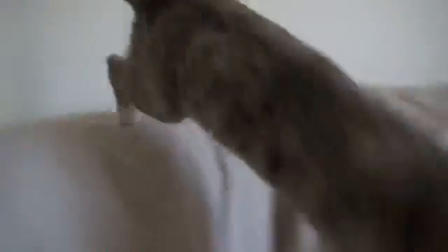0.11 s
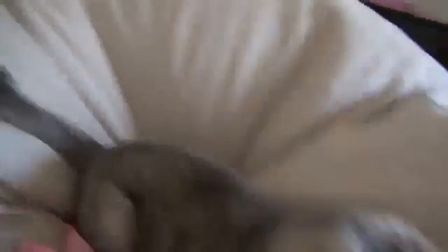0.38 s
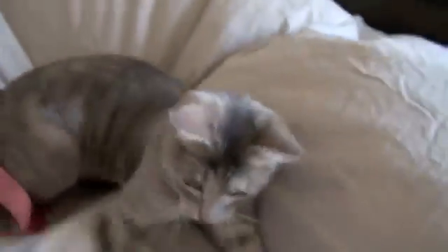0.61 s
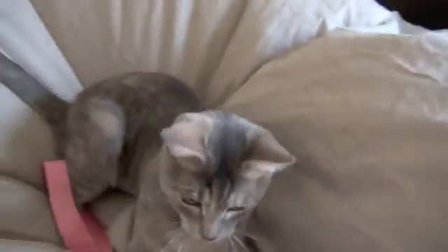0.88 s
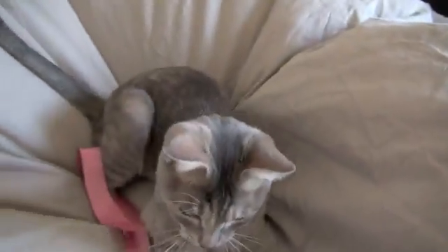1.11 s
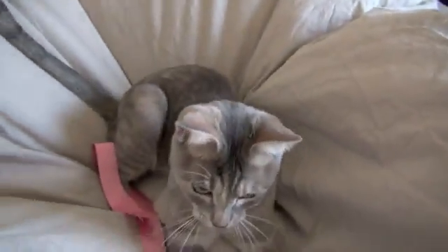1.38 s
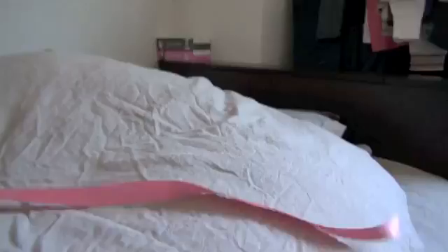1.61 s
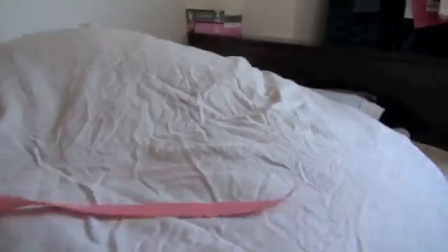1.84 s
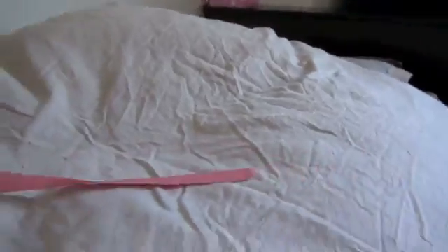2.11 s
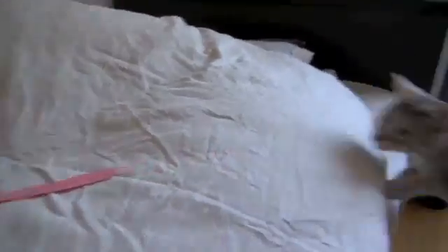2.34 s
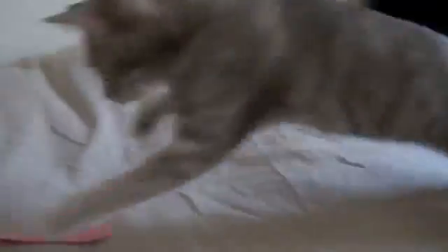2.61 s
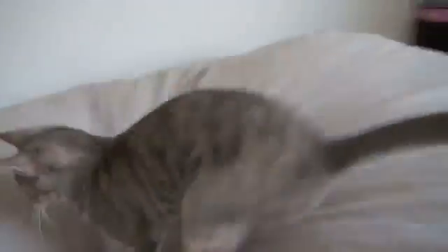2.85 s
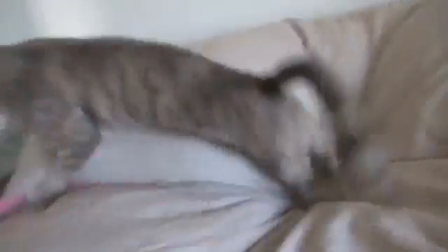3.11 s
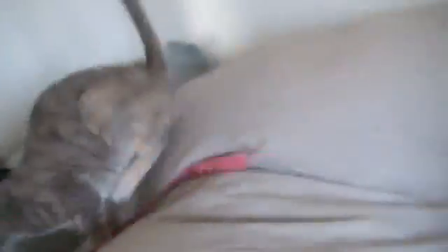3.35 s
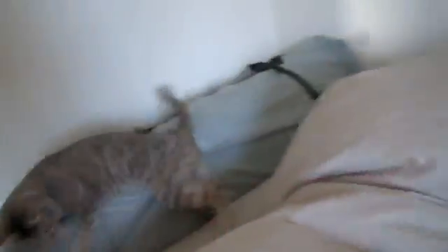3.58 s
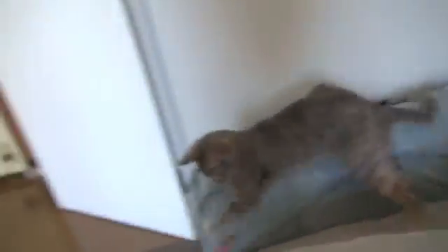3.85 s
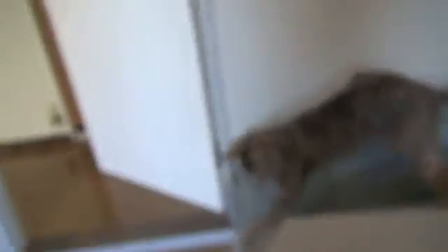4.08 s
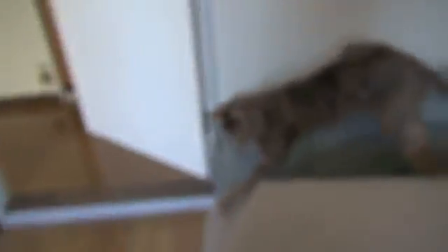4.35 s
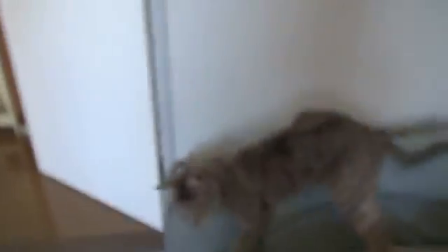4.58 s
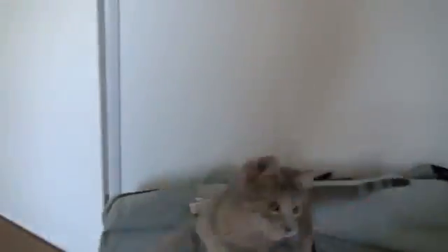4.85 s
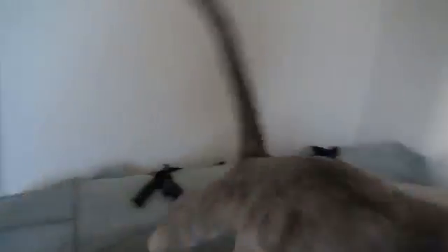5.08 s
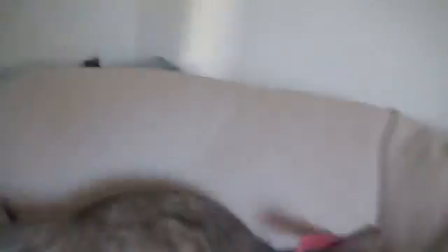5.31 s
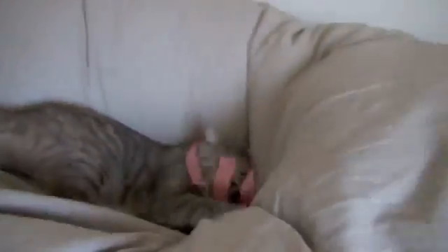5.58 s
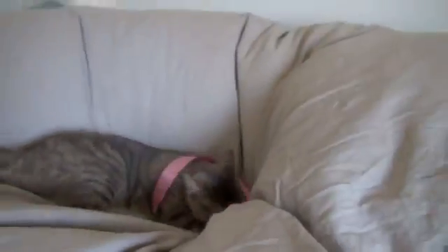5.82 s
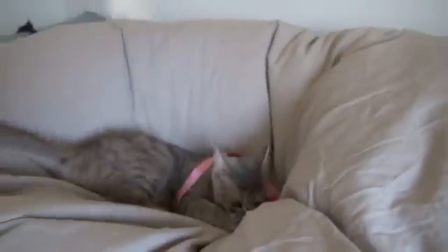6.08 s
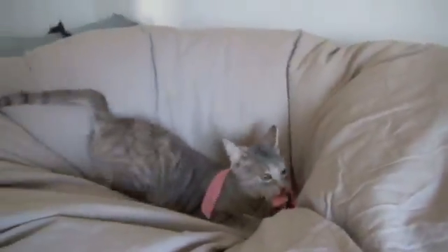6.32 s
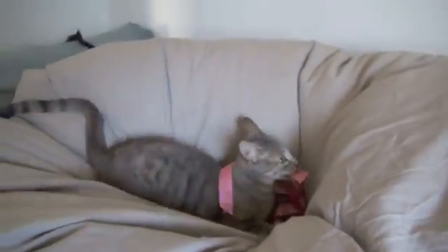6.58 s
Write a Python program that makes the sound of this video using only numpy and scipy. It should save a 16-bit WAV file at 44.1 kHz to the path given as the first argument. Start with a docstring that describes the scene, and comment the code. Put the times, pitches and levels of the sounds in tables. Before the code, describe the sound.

Bursts of a cat playing on a bed, heard close up in a small, dry room with faint hiss and low hum. Heavy padded thuds and rustling cover come first, then near silence after a short dip to nothing. Faint scratching leads into a tumble of thumps and slaps, quieter steps and hollow taps, another strong pounce, then soft stirring and a thin, high bird cheep.

```python
"""A quiet bedroom, a small stereo microphone close to the bed: faint hum, hiss of still air, a stirring cover.
At 0.2 s a cat pounces on a ribbon: ringing paw thumps, plucked threads, swells of rustle, then flapping cover.
A far bird cheeps in gliding sines at 1.4 s, and near 1.69 s everything fades out and in again.
Scratches of filtered noise and more pounces follow; at 3.9 s paws knock on something hollow by the bed.
The play dies down after 6.4 s and the bird cheeps last."""
import sys
import numpy as np
from scipy import signal
from scipy.io import wavfile

SR = 44100
rng = np.random.default_rng(int(sys.argv[2]) if len(sys.argv) > 2 else 0)


def master_out(mix):
    """Clip the mix to full scale and print it as 16-bit PCM to the path in sys.argv[1]."""
    frames = np.transpose(np.atleast_2d(mix))
    ceiling = np.clip(frames, -1, 1)
    pcm = np.round(ceiling * 32767).astype(np.int16)
    wavfile.write(sys.argv[1], SR, pcm)


def rack_gain(trim_db):
    """Turn a fader trim in dB into the linear factor to multiply a signal by."""
    fader = np.asarray(trim_db, float)
    return 10 ** (fader / 20)


N = 295205   # samples

# All levels are nominal, ahead of lifts, chance and the microphone.
# spectral shape of the still air, per Hz: f/Hz, level/dB
AIR = [(15, -37), (25, -8), (103, 3), (143, -5.5), (188, 3.5), (345, -2.5), (455, -1.5), (516, -1.5),
       (1070, -2), (2290, -6.5), (6770, -16.5), (8080, -17), (10400, -98), (13500, -75), (22000, -120)]
# left-right likeness of the air: f/Hz, likeness/1
AIR_LIKENESS = [(60, 0.98), (140, 1), (330, 0.91), (780, 0.64), (1840, 0.37), (4320, 0.59), (10200, 0.59)]
# faint hum: t/s, level/dB of the strongest line
HUM = [(0, -70), (.9, -62), (1.2, -60), (1.6, -62), (1.69, -72), (6.69, -74)]
# lines of the hum: f/Hz, level/dB
HUM_LINES = [(101, -9), (198, 0), (300, -12)]
# the cat never lies quite still, faint steady rustle: t/s, level/dB
STIRRING = [(0, -69), (.1, -57.5), (.19, -52), (.55, -52), (.95, -50.5), (1.05, -58.5), (1.22, -56),
            (1.45, -62), (1.58, -53), (1.9, -58), (2.15, -68), (2.74, -66), (2.85, -43), (3.4, -43),
            (3.66, -51), (3.8, -56), (4.1, -59), (4.36, -64), (4.65, -54.5), (4.88, -55), (4.98, -63),
            (5.12, -66), (5.7, -57), (5.96, -66), (6.23, -52), (6.69, -58.5)]
# strokes of body and legs over the cover: t/s of the peak, rustle level/dB, rise/s, fall/s,
# fibre hiss level/dB re rustle
STROKES = [(.213, -32.5, .01, 0.32, -10.5), (.329, -32, 0.039, 0.19, -9), (.679, -41, 0.14, 0.14, -6.5),
           (.7305, -29, 0.0035, 0.11, -10.5), (.77, -42, .04, 0.23, -5.5), (1.995, -52, 0.04, 0.068, -1),
           (2.1, -60, .03, .04, 0), (2.57, -52, 0.069, 0.22, -9), (2.777, -35, .004, 0.076, -9),
           (2.887, -42.5, 0.16, 0.11, -4), (3.011, -30.5, 0.09, 0.05, -7.5),
           (3.108, -29.5, 0.033, 0.085, -9.5), (3.327, -41.5, 0.29, 0.27, -9.5),
           (3.45, -42, 0.015, 0.19, -1), (3.614, -43, 0.12, 0.12, -3), (3.69, -38.5, 0.08, 0.017, -11.5),
           (3.928, -49.5, .07, 0.16, -5), (4.136, -50.5, .06, 0.095, -6), (4.185, -50, 0.12, 0.1, -1.5),
           (4.454, -53.5, .08, 0.13, -1.5), (4.635, -49.5, 0.077, 0.076, -1),
           (4.715, -38.5, 0.035, 0.087, -14.5), (4.831, -52, .03, 0.11, -2.5),
           (5.04, -46.5, 0.046, 0.078, -7), (5.145, -43, .004, 0.17, -2), (5.207, -34, .005, 0.19, -9),
           (5.3, -35.5, 0.26, 0.41, -9), (5.4, -42, 0.19, 0.5, -3.5), (5.67, -48.5, 0.065, 0.042, -5.5),
           (6.4, -53, 0.022, 0.089, -7)]
# weight pressed into the bedding: t/s of the peak, stuffing rumble level/dB, rise/s, fall/s,
# mattress boom level/dB re rumble
PRESSES = [(.21, -24.5, .008, 0.13, -8), (.257, -26.5, 0.044, .09, -15), (.333, -23.5, 0.021, 0.11, -9.5),
           (.679, -29, 0.027, 0.027, -33), (.729, -33.5, .004, 0.16, -5), (.84, -42, 0.066, 0.19, -12),
           (2.008, -43, .05, 0.03, -25), (2.558, -46.5, 0.051, 0.15, 1.5), (2.777, -37, .004, 0.16, -5),
           (2.969, -31, 0.034, 0.16, -0.5), (3.011, -30.5, 0.068, 0.062, -4), (3.11, -34, 0.044, 0.12, -14),
           (3.327, -42, 0.22, 0.26, -14), (3.45, -39, .005, .4, 0), (3.614, -33, 0.12, 0.1, 1),
           (3.69, -39, 0.027, 0.05, -20), (3.758, -49.5, 0.041, 0.16, -2), (3.928, -41, 0.032, 0.094, 3.5),
           (4.136, -44.5, .05, 0.22, -17), (4.25, -66, 0.57, 0.37, 6), (4.454, -59, 0.06, .2, -4),
           (4.715, -40.5, 0.017, 0.099, -18), (4.86, -50.5, 0.087, 0.23, -7), (5.06, -50, 0.11, 0.066, 0.5),
           (5.14, -41, .005, 0.24, -16), (5.254, -28.5, 0.086, 0.22, -2.5),
           (5.375, -33.5, 0.21, 0.056, -4.5), (5.645, -49, 0.026, 0.13, -4), (6.188, -59, .05, 0.046, 2),
           (6.42, -55.5, 0.054, 0.078, 6), (6.55, -71, 0.46, .5, 8)]
# spectral shapes of cover, stuffing and mattress, per Hz: f/Hz, level/dB
RUSTLE = [(380, -13.5), (650, -2.5), (921, -6), (998, -4.5), (1460, -4.5), (1760, -5), (6770, -13.5),
          (9150, -25.5), (10400, -83), (13500, -50), (22000, -120)]
RUMBLE = [(100, -45), (170, -0.5), (323, -3.5), (477, -5), (549, -9.5), (900, -6), (1170, -29),
          (1980, -120)]
MATTRESS = [(15, -45), (25, -33), (54, 3), (86, -5), (135, 8), (180, -9.5), (230, -38), (400, -120)]
# left-right likeness of the bedding: f/Hz, likeness/1
CLOTH_LIKENESS = [(60, 0.99), (140, 1.0), (330, 1), (780, 0.88), (1840, 0.72), (4320, 0.84), (10200, 0.67)]
# where the cat is: t/s, left re right level/dB
CLOTH_PAN = [(0.1, -6), (0.73, 0.5), (1.62, -2), (1.79, 2), (2.59, -2.5), (2.75, 2.5), (3.35, 0),
             (3.58, 1.5), (4.84, 1.2), (4.99, -2.5), (5.92, 0.6), (6.69, 0)]
# paw and body landings in the stuffing: t/s, peak level/dB, starting f/Hz, ring/cycles
THUMPS = [(0.206, -14, 207, 1.9), (0.219, -17, 124, 3), (0.236, -13, 497, 1.8), (0.258, -30, 295, 1),
          (0.276, -16, 364, 1.5), (0.338, -0.5, 434, 1.4), (0.399, -21, 523, 1.8), (0.426, -20, 412, 1.1),
          (0.577, -27, 438, 1.9), (0.656, -24.5, 374, 3), (0.728, -13, 477, 3.5), (0.743, -22.5, 385, 3.7),
          (0.83, -21, 614, 2.2), (0.87, -34.5, 306, 8.1), (0.939, -32, 340, 5.8), (1.987, -32.5, 565, 3),
          (1.995, -36, 325, 2.1), (2.268, -45, 127, 7.3), (2.428, -39.5, 131, 4.4), (2.552, -22, 222, 1.1),
          (2.795, -16, 447, 1.14), (2.963, -14.5, 255, 2.7), (2.979, -17, 245, 2.4), (2.993, -16, 195, 2.3),
          (3.011, -13.5, 465, 1.7), (3.085, -21, 266, 1.5), (3.12, -20.5, 310, 6.2),
          (3.315, -26.5, 264, 4.5), (3.369, -27, 290, 4.4), (3.45, -19.5, 221, 4.5),
          (3.476, -13.5, 287, 4.9), (3.507, -19.5, 175, 6.5), (3.544, -18.5, 165, 5.7),
          (3.603, -15.5, 330, 2.7), (3.594, -23, 85, 2.4), (3.621, -20, 218, 3), (3.628, -23, 72, 2.8),
          (3.688, -22.5, 360, 2.6), (3.752, -35, 66, 3.7), (3.925, -18.5, 188, 2.4),
          (3.935, -31, 62.4, 4.2), (4.129, -32, 307, 1.4), (4.704, -23, 452, 2.1), (5.154, -29, 323, 1.6),
          (5.208, -20, 480, 2.4), (5.241, -24.5, 223, 3.5), (5.256, -27, 261, 2.7), (5.274, -23, 368, 1.3),
          (5.297, -8, 301, 0.95), (5.366, -12, 403, 1.1), (5.409, -34, 285, 2.8), (5.516, -27, 330, 2.1),
          (5.642, -29.5, 206, 2.7), (5.708, -42, 293, 6), (6.177, -43, 141, 3), (6.39, -43, 121, 2.3)]
# claws pluck threads of the cover: t/s, peak level/dB, starting f/Hz
PLUCKS = [(0.2124, -21.5, 900), (0.2224, -15.5, 1270), (0.3262, -16, 1060), (0.7277, -17, 1520),
          (2.7749, -24.5, 902), (2.8074, -32, 1720), (2.94, -24, 970), (2.961, -16, 880),
          (3.012, -16, 2220), (3.0927, -26, 2560), (3.457, -33, 1620), (3.6046, -25.5, 1180),
          (3.688, -25, 1130), (4.818, -30, 1620), (5.145, -30, 2250), (5.2031, -21, 1110),
          (5.238, -20, 1130), (5.2971, -19.5, 980), (5.397, -23, 1050)]
# the cover snaps taut or slaps down: t/s, peak level/dB
SLAPS = [(0.659, -16), (0.926, -31), (1.984, -26.5), (2.939, -27), (2.961, -11.5), (3.092, -13),
         (3.447, -18), (3.601, -16), (3.685, -17), (4.13, -28.5), (4.421, -28.5), (4.819, -20.5),
         (5.205, -15), (6.394, -25.5)]
# bird cheeps, one list each: t/s, f/Hz, level/dB
CHEEPS = [
    [(1.447, 7980, -67), (1.47, 8400, -63), (1.51, 8430, -62), (1.525, 8330, -67)],
    [(2.67, 8230, -65), (2.70, 8330, -65), (2.74, 8530, -67), (2.775, 8300, -67)],
    [(6.665, 7300, -64), (6.70, 7600, -60)],
]
# ribbon and claw tips drag over the weave: t/s, level/dB, centre f/Hz, width f/Hz, length/s
SCRATCHES = [(1.952, -50, 2630, 900, 0.0089), (2.091, -50.5, 2660, 1800, 0.026),
             (2.342, -44.5, 1590, 900, 0.0068), (2.477, -49, 1320, 150, 0.026),
             (4.174, -57, 6000, 3000, 0.041), (4.29, -42, 4900, 6960, .0015),
             (4.3, -69.5, 5500, 4000, 0.013), (4.604, -50, 5800, 4220, 0.057),
             (4.708, -50, 4470, 1190, 0.042), (4.703, -48.5, 2530, 600, 0.078),
             (5.032, -42, 1700, 400, 0.028)]
# paws knock on something hollow at the bedside: t/s, peak level/dB, extra level/dB of the lowest mode
KNOCKS = [(3.896, -30, -15), (3.905, -50, -24), (4.422, -35.5, -18), (4.434, -32, -17), (4.703, -28, 5.5),
          (4.713, -28, -6), (4.722, -31.5, 8.5), (4.755, -37, 9), (4.799, -42, 13), (4.823, -35.5, 7.5),
          (4.846, -47, 0.5)]
# modes of the hollow thing: f/Hz, level/dB, t60/s (0.16 s at most is used)
HOLLOW = [(261, 0.5, 0.19), (490, 1.5, 0.13), (634, 0.5, 0.087), (840, -20, 0.055)]


def rms_one(x):
    """Scaled to unit rms."""
    return x / np.sqrt(np.mean(x ** 2) + 1e-20)


def in_time(rows):
    """Columns of a curve, one value a sample."""
    s, *columns = np.transpose(rows)
    return [np.interp(np.arange(N) / SR, s, c) for c in columns]


def at_hz(points, hz):
    """A spectrum read on a log-frequency axis."""
    points = np.array(points)
    return np.interp(np.log(hz), np.log(points[:, 0]), points[:, 1])


def drift(rate):
    """Random wander of rms 1: noise through two equal lowpass poles at rate (Hz)."""
    step = 20   # computed on every 20th sample, then interpolated
    r = np.exp(-2 * np.pi * rate * step / SR)
    noise = rng.standard_normal(N // step + 2002)
    slow = signal.lfilter([1], [1, -2 * r, r * r], noise)[2000:]   # past the filter's start
    return np.interp(np.arange(N) / step, np.arange(len(slow)), rms_one(slow))


def bands(spectrum, likeness, patchy_db, patch_rate, grain=1):
    """Half-octave bands of stereo noise with own level, flicker and likeness: (centre Hz, sound) pairs."""
    edges = 25 * 2 ** np.arange(0, 9.1, .5)
    together = drift(patch_rate)
    white = rng.standard_normal((2, 2, N)) * grain
    for k, (low, high) in enumerate(zip(edges, edges[1:])):
        hz = np.sqrt(low * high)
        if spectrum[0][0] <= hz <= spectrum[-1][0]:
            band = signal.butter(2, [low, high], "band", fs=SR, output="sos")
            mid, side = signal.sosfilt(band, white[k % 2])   # neighbours draw on separate noise
            alike = np.clip(at_hz(likeness, hz), 0, 1)
            flicker_db = patchy_db * (0.52 * together + 0.56 * drift(patch_rate))
            gain = rack_gain(at_hz(spectrum, hz) + flicker_db)
            yield hz, gain * (np.sqrt(1 + alike) * mid + np.sqrt(1 - alike) * side * [[1], [-1]])


def swells(rows):
    """Summed power of swells that grow and die at steady dB rates, for the main layer and the one tied to it."""
    swell_db = 20   # level change over one rise or fall
    main, tied, t = np.zeros(N), np.zeros(N), np.arange(N) / SR
    for s, peak_db, rise, fall, tied_db in rows:
        near = slice(max(round((s - 3 * rise) * SR), 0), round((s + 3 * fall) * SR))
        away = np.maximum((s - t[near]) / max(rise, .001), (t[near] - s) / max(fall, .001))
        power = rack_gain(peak_db - swell_db * away) ** 2
        main[near] += power
        tied[near] += power * rack_gain(tied_db) ** 2
    return main, tied


def blows(rows, lift_db, rise, sag):
    """Damped rings that lose 30 dB over their cycles; rise is in cycles, sag lowers the pitch per cycle."""
    out = np.zeros(N)
    for s, peak_db, hz, cycles in rows:
        start = round(s * SR)
        turns = hz * np.arange(min(SR // 4, N - start)) / SR
        decay = rack_gain(peak_db + lift_db - 30 * turns / max(cycles, .5))
        shape = (1 - np.exp(-turns / rise)) * decay
        out[start:][:len(turns)] += shape * np.sin(2 * np.pi * turns / (1 + sag * turns))
    return out


def still_air():
    """Steady broadband noise whose bands flicker slowly."""
    air = sum(sound for hz, sound in bands(AIR, AIR_LIKENESS, patchy_db=3.5, patch_rate=6.3))
    return rack_gain(-53.5) * rms_one(air)


def hum():
    """Low lines that waver together in pitch and strength."""
    level_db, = in_time(HUM)
    turns = np.cumsum(1 + 0.0136 * drift(4.45)) / SR
    throb_db = 4 * drift(10)
    lines = sum(rack_gain(db + throb_db) * np.sin(2 * np.pi * hz * turns) for hz, db in HUM_LINES)
    return np.sqrt(2) * rack_gain(level_db) * lines


def cloth_noise():
    """Fibres catch and slip in clumps of grains: the body of the rustle and its hiss, each of rms 1."""
    split_hz, catches_per_s = 4200, 2500
    catching = rng.random(N) < catches_per_s * rack_gain(6.0 * drift(20)) / SR
    strength = rack_gain(2.97 * np.minimum(rng.exponential(1, N), 4))
    grain = 0.8 + 1.13 * catching * strength
    parts = list(bands(RUSTLE, CLOTH_LIKENESS, patchy_db=1.0, patch_rate=16.0, grain=grain))
    body = sum(sound for hz, sound in parts if hz < split_hz)
    hiss = sum(sound for hz, sound in parts if hz >= split_hz)
    return rms_one(body), rms_one(hiss)


def bedding_noise():
    """Lumpy noise of the stuffing and smoother noise of the mattress, each of rms 1."""
    lumps = rng.random(N) < 300 / SR   # 300 a second
    grain = 0.65 + 8.4 * lumps * rack_gain(3.0 * np.minimum(rng.exponential(1, N), 2))
    stuffing = bands(RUMBLE, CLOTH_LIKENESS, patchy_db=1.5, patch_rate=39, grain=grain)
    mattress = bands(MATTRESS, CLOTH_LIKENESS, patchy_db=4.5, patch_rate=24)
    return rms_one(sum(sound for hz, sound in stuffing)), rms_one(sum(sound for hz, sound in mattress))


def duvet():
    """Strokes rustle and hiss, presses rumble in the stuffing and boom in the mattress; all add in power."""
    stir_hiss_db, stir_rumble_db, stir_boom_db = -5.5, -5, -13   # re the steady rustle
    hiss_lag_s = .012   # fine fibres join a stroke late
    stir = rack_gain(in_time(STIRRING)[0]) ** 2
    body, hiss = cloth_noise()
    rumble, boom = bedding_noise()
    slap_body, slap_hiss = slaps()
    stroke_body, stroke_hiss = swells(STROKES)
    late = np.exp(-1 / (hiss_lag_s * SR))
    stroke_hiss = signal.lfilter([1 - late], [1, -late], stroke_hiss)
    press_rumble, press_boom = swells(PRESSES)
    body = body * np.sqrt(stir + stroke_body + slap_body)
    hiss = hiss * np.sqrt(stir * rack_gain(stir_hiss_db) ** 2 + stroke_hiss + slap_hiss)
    rumble = rumble * np.sqrt(stir * rack_gain(stir_rumble_db) ** 2 + press_rumble)
    boom = boom * np.sqrt(stir * rack_gain(stir_boom_db) ** 2 + press_boom)
    pan_db, = in_time(CLOTH_PAN)
    return (body + hiss) * rack_gain([pan_db / 2, -pan_db / 2]) + rumble + boom


def bedroom(x):
    """Room echo of a mono sound: six feedback delays a side, duller on every round."""
    t60_s, wall_cut_hz = 0.087, 8800
    out, dull = np.zeros((2, N)), np.exp(-2 * np.pi * wall_cut_hz / SR)
    lags = (rng.uniform(0.013, 0.035, 12) * SR).astype(int)
    for k, lag in enumerate(lags):
        loop, gain, state = x.copy(), rack_gain(-60 * lag / SR / t60_s), [0.]
        for i in range(lag, N, lag):
            back, state = signal.lfilter([gain * (1 - dull)], [1, -dull], loop[i - lag:i], zi=state)
            loop[i:i + lag] += back[:N - i]
        out[k % 2] += (loop - x) * (-1) ** (k // 2)   # echoes only, signs mixed
    return out


def thumps():
    """A soft landing sucks the air in first, then rings a few cycles, sagging in pitch as the stuffing gives way."""
    return -blows(THUMPS, lift_db=0.5, rise=0.14, sag=0.033)


def claws():
    """A plucked thread ticks at once and is damped by the cloth."""
    ring_cycles = 2.04
    return -blows([(*row, ring_cycles) for row in PLUCKS], lift_db=8.0, rise=0.21, sag=0.01)


def slaps():
    """Power envelopes of body and hiss: each slap rises within a few milliseconds and dies away."""
    crest_db, treble_db = 19.5, -11   # peak over envelope; hiss re body
    rise_s, t60_s = 0.0036, 0.13
    body = np.zeros(N)
    for s, peak_db in SLAPS:
        start = round(s * SR)
        t = np.arange(min(SR // 2, N - start)) / SR
        shape = (1 - np.exp(-t / rise_s)) * rack_gain(-60 * t / t60_s)
        body[start:][:len(t)] += (rack_gain(peak_db - crest_db) * shape) ** 2
    return body, body * rack_gain(treble_db) ** 2


def bird():
    """Thin gliding whistles with soft ends."""
    out, t = np.zeros(N), np.arange(N) / SR
    for rows in CHEEPS:
        hz, level_db = in_time(rows)
        ends = np.clip(np.minimum(t - rows[0][0], rows[-1][0] - t) / .006, 0, 1)
        whistle = np.sin(2 * np.pi * np.cumsum(hz) / SR)
        out += np.sqrt(2) * rack_gain(level_db) * ends * whistle
    return out


def scratches():
    """Dense thread slips excite one resonance for the length of the stroke."""
    out, slips = np.zeros(N), rng.standard_normal((len(SCRATCHES), SR // 8))
    t = np.arange(SR // 8) / SR
    for (s, db, hz, width_hz, length), noise in zip(SCRATCHES, slips):
        r = np.exp(-np.pi * width_hz / SR)
        stage = [1, 0, -1, 1, -2 * r * np.cos(2 * np.pi * hz / SR), r * r]
        tone = rms_one(signal.sosfilt([stage, stage], noise))
        stroke = np.sin(np.pi * np.sqrt(np.clip(t / length, 0, 1)))   # quick catch, slower release
        out[round(s * SR):][:len(t)] += rack_gain(db) * stroke * tone
    return out


def knocks():
    """Each knock strikes every mode with a strength of its own; a flat paw favours the lowest."""
    strength_db = rng.normal(0, 2, (len(KNOCKS), len(HOLLOW)))
    strength_db[:, 0] += np.array(KNOCKS)[:, 2]
    rows = []
    for (s, peak_db, _), strengths in zip(KNOCKS, strength_db):
        for (hz, db, t60), own_db in zip(HOLLOW, strengths):
            cycles = min(t60, .16) * hz / 2   # 30 dB takes half of t60
            rows.append((s, peak_db + db + own_db, hz, cycles))
    return blows(rows, lift_db=-12.0, rise=0.28, sag=0)


def scene():
    """Cat and duvet close by with the room's echo, over still air, hum and the far bird."""
    near = duvet() + thumps() + claws() + scratches() + knocks()
    echo = rack_gain(-23.5) * bedroom(near.mean(axis=0))
    far_bird = bird() * rack_gain([[1.5], [-1.5]])   # a little to the left
    return near + echo + still_air() + hum() + far_bird


def roll_off(x):
    """The treble ends steeply here."""
    return signal.sosfilt(signal.butter(12, 10750, fs=SR, output="sos"), x)


def record(dry):
    """The microphone rounds peaks and cuts the top; the sound fades out and in again."""
    join_s, fade_out_s, fade_in_s = 1.688, .095, .11
    rounded = 0.43 * np.tanh(dry / 0.48)
    top_cut = signal.cheby2(16, 45, 10950, fs=SR, output="sos")   # 45 dB down from 10950 Hz
    t = np.arange(N) / SR - join_s
    fade = np.clip(np.maximum(-t / fade_out_s, t / fade_in_s), 0, 1)
    mix = signal.sosfilt(top_cut, rounded) * fade
    return roll_off(mix)


dry = scene()
out = record(dry)
master_out(out)
```